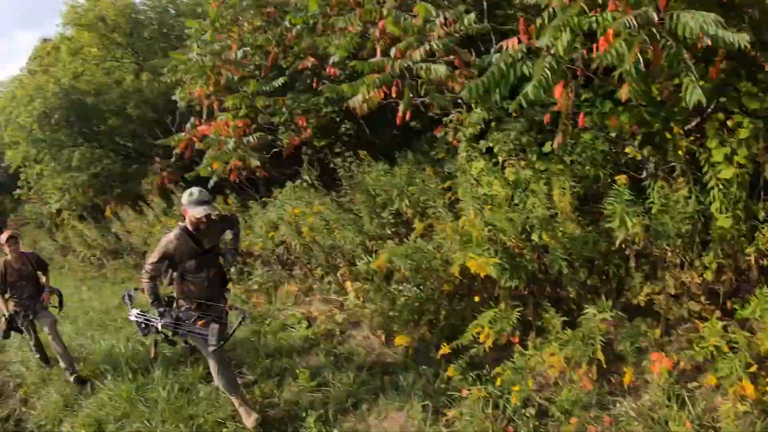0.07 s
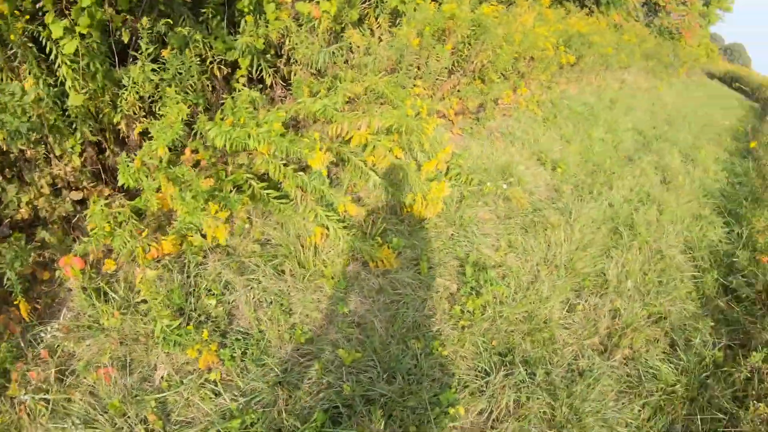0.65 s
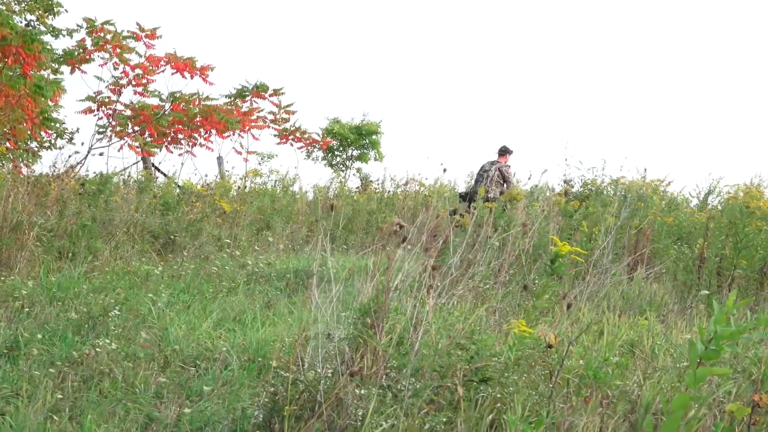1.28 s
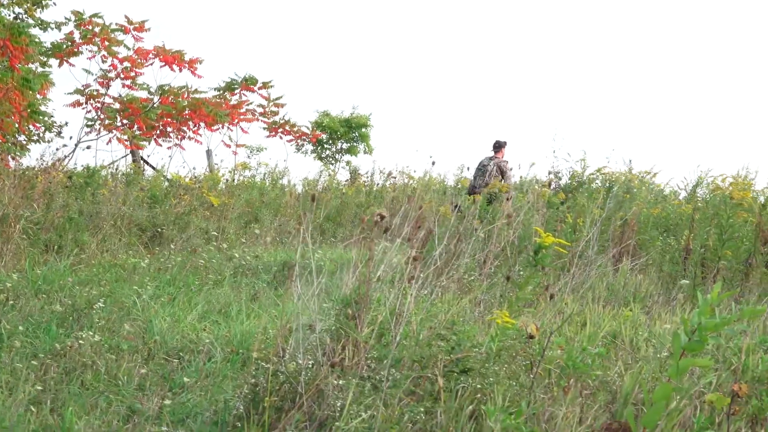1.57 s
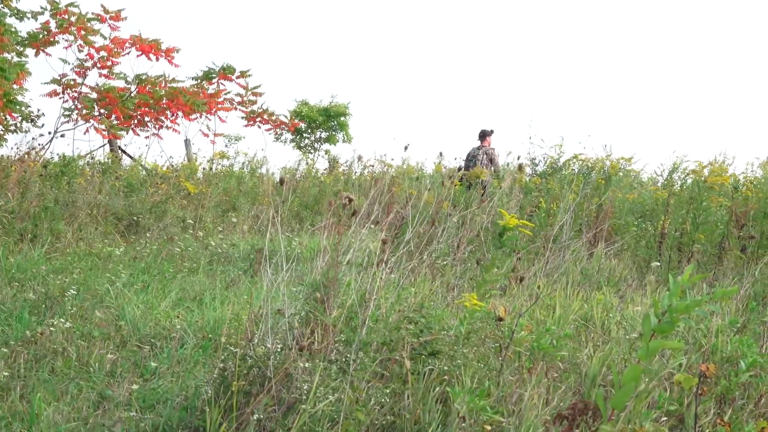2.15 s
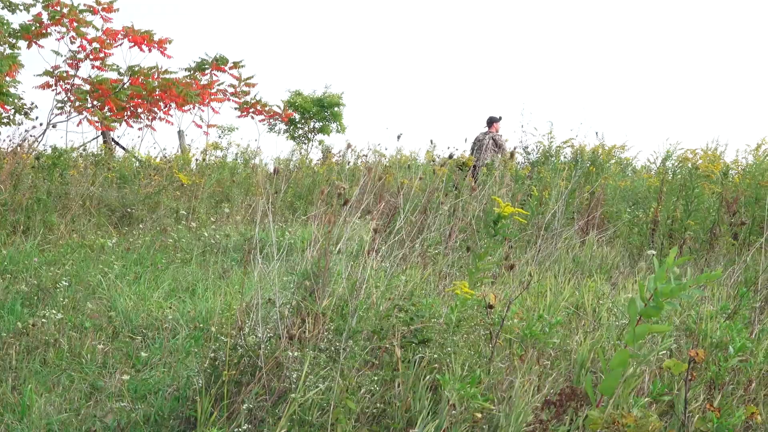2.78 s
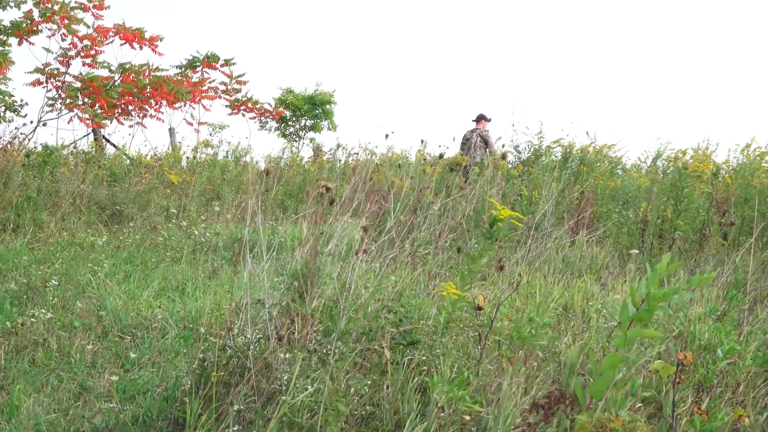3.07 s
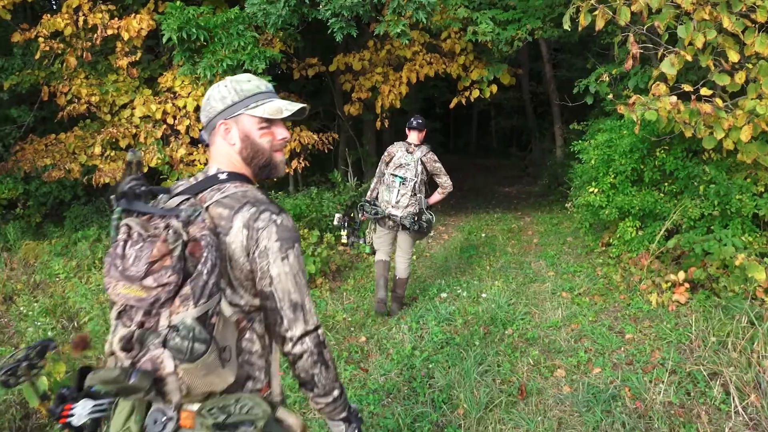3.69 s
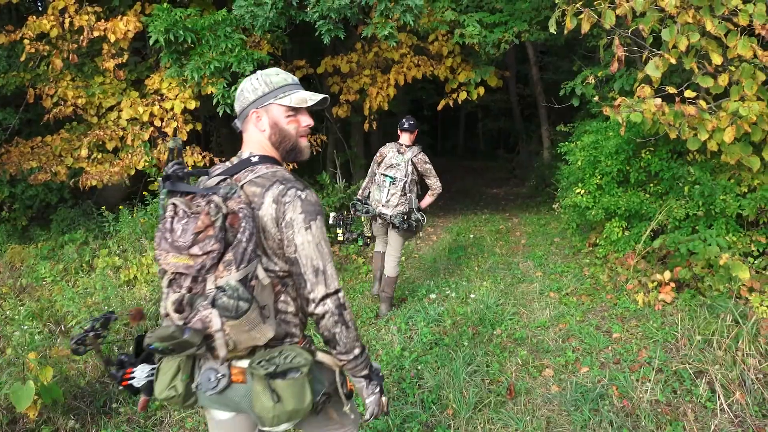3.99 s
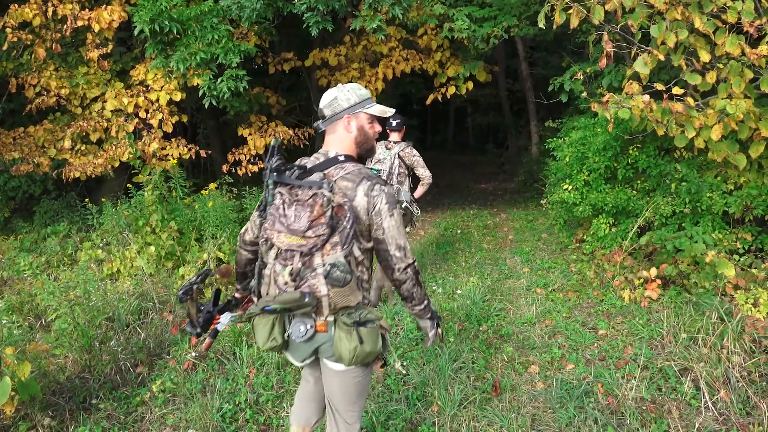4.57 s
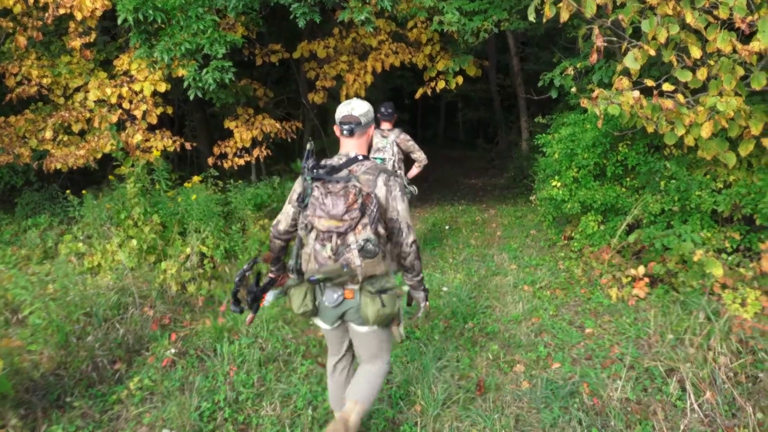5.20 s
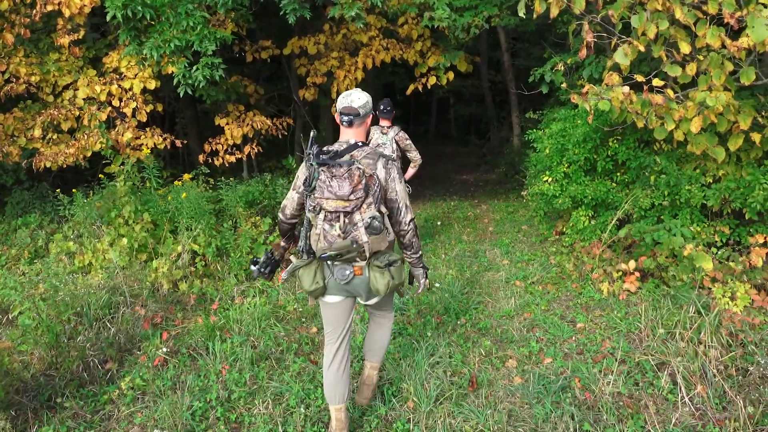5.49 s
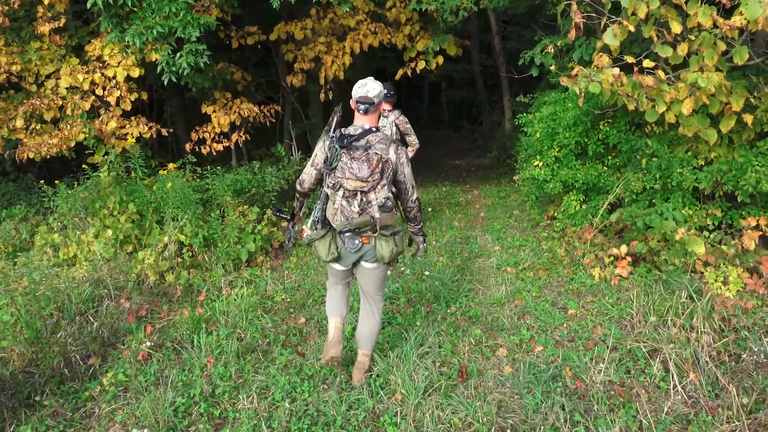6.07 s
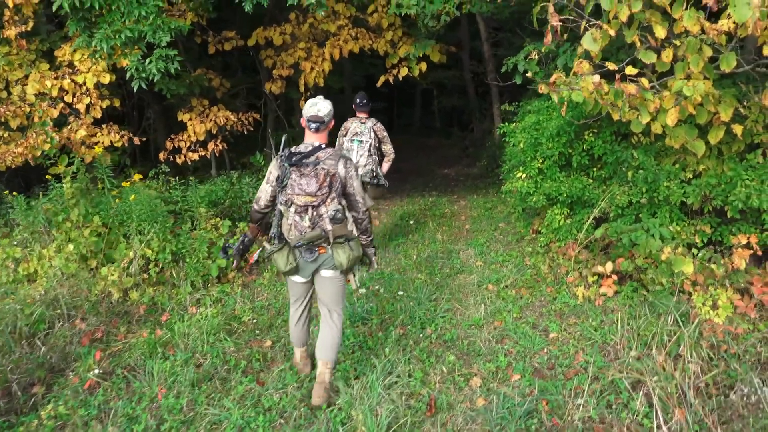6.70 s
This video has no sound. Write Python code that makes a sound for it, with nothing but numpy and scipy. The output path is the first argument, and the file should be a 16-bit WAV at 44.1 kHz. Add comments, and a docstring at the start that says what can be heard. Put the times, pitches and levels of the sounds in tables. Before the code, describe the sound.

Outdoors, a few steps brush through grass before an abrupt change to pulsing field crickets and a low, gusty rumble of wind on the microphone. About halfway through, the wind eases and walking resumes, with crackling blades, scuffing boots and many small stem snaps. One cricket trills quickly while another ticks irregularly, over a steady shimmer of far insects and soft air in the leaves.

```python
"""People walk through tall grass: legs swish through the blades, dry stems snap and boots scuff.
Crickets sing all round by drawing a scraper on one wing along a toothed file on the other.
We listen from a path, then suddenly from an open field, where their loud pulses fall in pitch,
then gradually from the edge of a wood, with a fast trill and a ticking cricket.
Behind them are far insects, air in the leaves and wind on the microphone, strongest in the field."""
import sys
import numpy as np
from scipy import signal
from scipy.fft import rfft, irfft, next_fast_len
from scipy.io import wavfile
from scipy.ndimage import uniform_filter1d, map_coordinates

SR = 44100
rng = np.random.default_rng(int(sys.argv[2]) if len(sys.argv) > 2 else 0)


def inscribe(sig):
    """Save sig as 16-bit PCM at rate SR to the path in sys.argv[1].

    A 1-D sig is mono; a 2-D sig holds one channel per row.
    Samples are clipped to [-1, 1] before scaling.
    """
    pcm = np.round(np.clip(np.atleast_2d(sig).T, -1, 1) * 32767)
    wavfile.write(sys.argv[1], SR, pcm.astype(np.int16))


N = 306390
T = np.arange(N) / SR

# Table levels are relative: the functions add their own gains.
# legs sweeping through grass: fastest moment t/s, fade time/s, swish level/dB, crackle level/dB
LEG_SWEEPS = [(.015, 0.11, -40.5, -45), (0.19, 0.016, -45, -42), (0.585, 0.072, -38.5, -58),
              (0.669, 0.06, -32.5, -38.5), (4.186, 0.03, -47, -44), (4.386, 0.086, -37, -37.5),
              (4.553, 0.05, -46, -42), (4.79, 0.046, -52, -43), (5.09, 0.047, -54, -43),
              (5.188, 0.085, -41, -44), (5.366, 0.12, -46.5, -66), (5.76, 0.08, -46, -38.5),
              (5.892, 0.048, -45.5, -44), (6.039, 0.064, -40, -40.5), (6.3, .12, -64, -51),
              (6.454, .06, -43.5, -52), (6.687, 0.034, -43.5, -42), (6.827, 0.095, -42.5, -43)]
# faint rustle between sweeps, a row each for path, field and wood: swish level/dB, crackle level/dB
RUSTLE = [(-50, -57), (-58, -71), (-54.5, -56.5)]
# tone of soft blades: f/Hz, level/dB
SWISH_TONE = [(150, 6), (400, -2), (700, -0.5), (1400, 1), (2800, 0), (5000, 0.5), (7500, -2),
              (10000, -9.5), (15500, -15)]
# tone of dry blades: f/Hz, level/dB
CRACKLE_TONE = [(1500, -5), (4000, -17), (6500, -4), (9000, 4), (10600, -9), (12600, 2), (15800, -9)]
# stems breaking: t/s, level/dB, extra level of the woody part/dB
STEM_SNAPS = [(0.0796, -18, -18), (3.941, -28, 3), (4.1671, -26, -8), (4.5359, -20, -19), (4.773, -24, -20),
              (4.859, -14.5, -27), (5.075, -26, -2), (5.235, -19.5, -5.5), (5.668, -20.5, -25),
              (5.7274, -21, -30), (5.8836, -26, -8), (5.914, -18.5, -6.5), (6.1118, -21, -6),
              (6.692, -21, -26.5), (6.7422, -20, -4), (6.798, -21, -18)]
# rubs and knocks: t/s, level/dB, f/Hz, band width/Hz, half length/s
BOOT_SCUFFS = [(.08, -22.5, 2040, 800, 0.0034), (.225, -29.5, 900, 350, .0072),
               (.603, -28.5, 920, 600, 0.014), (.68, -39, 650, 600, 0.048),
               (3.227, -41.5, 1000, 1200, 0.054), (4.323, -31, 2580, 1300, 0.025),
               (4.369, -29.5, 2920, 1500, .02), (4.685, -37.5, 1210, 1000, 0.017),
               (5.29, -31.5, 1380, 300, 0.0086), (5.505, -30.5, 760, 330, 0.041),
               (5.537, -33.5, 1300, 800, 0.05), (5.549, -25.5, 1210, 168, .02),
               (5.78, -33, 600, 700, 0.014), (5.9, -31, 880, 600, 0.026), (6.051, -29.5, 2820, 400, 0.0073),
               (6.047, -24, 8100, 700, 0.0064), (6.515, -30.5, 980, 1100, 0.0084)]
# chirps of near field crickets: first stroke t/s, last stroke t/s, level/dB, f/Hz
NEAR_CHIRPS = [(0.834, 1.108, -35, 4564), (1.308, 1.352, -37.5, 4590), (1.511, 1.597, -37, 4580),
               (1.663, 1.742, -36, 4695), (1.86, 1.954, -39.5, 4584), (2.165, 2.211, -36.5, 4560),
               (2.271, 2.361, -33.5, 4680), (2.47, 2.607, -39, 4550), (2.714, 2.811, -40, 4850),
               (2.915, 2.995, -37.5, 4470), (3.217, 3.304, -36.5, 4550), (3.468, 3.654, -35, 4673),
               (3.958, 4.015, -37, 4640), (4.15, 4.245, -42, 4570), (6.774, 6.819, -33, 5220)]
# how the ground cricket's trill grows: t/s, level/dB
TRILL_LEVELS = [(3.7, -62), (4.1, -48.5), (4.6, -44), (5.4, -45), (6.3, -41), (6.95, -40)]
# wing strokes of the ticking cricket: t/s, level/dB
TICK_STROKES = [(4.146, -39), (4.214, -37), (4.285, -40), (4.358, -41.5), (4.439, -33), (4.734, -24),
                (4.945, -28), (5.024, -39), (5.182, -28.5), (5.787, -34), (5.848, -34.5), (5.926, -34),
                (6.005, -36.5), (6.101, -32.5), (6.2, -35.5), (6.281, -38), (6.377, -31.5), (6.482, -29),
                (6.558, -37), (6.681, -28), (6.867, -29)]
# far insect choirs: f/Hz, band width/Hz, path level/dB, field level/dB, wood level/dB
INSECT_BANDS = [(3214, 230, -71, -49.5, -72), (3346, 290, -61, -65, -49.5), (4834, 450, -45.5, -47.5, -48),
                (5400, 440, -52, -54.5, -50), (7300, 860, -59, -57.5, -48), (7680, 1800, -47.5, -52, -50)]
# tone of air in far leaves: f/Hz, path level/dB, field level/dB, wood level/dB
AIR_TONES = [(102, -11, -5, -11), (290, -2.5, 1, 2.5), (513, 2, 0.5, -0.5), (810, -0.5, 0.5, 1.5),
             (1080, -2, -2.5, -2.5), (1470, -2, -3.5, -4), (2380, -9, -8, -8), (4050, -11, -8, -11.5),
             (6100, -14, -11, -19.5), (9150, -20, -18, -19), (11700, -16, -22, -25),
             (15800, -21, -20, -18.5)]
# steady wind on the microphone: path level/dB, field level/dB, wood level/dB
BREEZE_LEVELS = [-47.5, -34, -45.5]
# gusts of wind: t/s, rise and fall time/s, level/dB
WIND_GUSTS = [(0.217, .05, -37), (1.652, 0.096, -25.5), (2.056, 0.42, -32), (2.503, .12, -31),
              (3.023, .1, -30), (3.73, 0.091, -38), (3.953, 0.055, -33), (5.522, 0.064, -35),
              (6.95, 0.24, -41)]
# tone of the wind's rumble: f/Hz, level/dB
RUMBLE_TONE = [(12, -40), (28, 11), (52, 0.5), (75, -1.5), (130, -4), (155, -13), (210, -18.5),
               (400, -30.5), (1200, -65)]
# tone of the air's slow sway, mostly too low to hear: f/Hz, level/dB
SWAY_TONE = [(2, -10.5), (6, -8), (9, -5), (14, -4), (19, -6), (26, -30), (38, -34), (60, -78), (120, -62)]
# strength of that sway: t/s, level/dB
SWAY_LEVELS = [(0.0, -20.5), (0.25, -11), (0.58, -21.5), (0.64, -16), (0.83, -26), (0.97, -20.5),
               (1.76, -21.5), (1.84, -16), (2.15, -21), (3.81, -18), (4.1, -30), (4.51, -17.5), (5.13, -37),
               (5.26, -22), (6.21, -18.5), (6.41, -28.5), (6.89, -15), (6.95, -29)]


def legs_in_grass(gain_db=-2):
    """Each leg drags through tufts: soft blades swish and dry ones crackle, both in clumps."""
    power = amp(RUSTLE).T ** 2 @ places() ** 2
    for at, fade, *levels in LEG_SWEEPS:
        power += np.outer(amp(levels), swell(at, rise=1.05 * fade, fall=fade, shape=1.1)) ** 2
    swish, crackle = np.sqrt(power)
    tufts = unit(amp(wander(130)))
    soft = colour(tufts * blade_clicks(per_s=12000, spread_db=2.5), SWISH_TONE, band=(1700, 2900))
    dry = colour(tufts * blade_clicks(per_s=5500, spread_db=3), CRACKLE_TONE, band=(10500, 15500))
    return amp(gain_db) * (swish * soft + crackle * dry)


def blade_clicks(per_s, spread_db):
    """Blade taps against blade in tiny clicks: many faint, a few strong."""
    size = amp(spread_db * np.minimum(rng.exponential(1, N), 4))
    return unit(size * rng.standard_normal(N) * (rng.random(N) < per_s / SR))


def snapping_stems(crack_s=.00058, splinter_s=.0022, splinter_db=-19):
    """A stem breaks with one sharp crack and a short splintering."""
    out, t = np.zeros(N), np.arange(2048) / SR
    fade = np.exp(-t / crack_s) + amp(splinter_db) * np.exp(-t / splinter_s)
    woody_tone = [(300, -9), (1900, 7), (4500, 8), (8000, -16), (15000, -50)]
    crisp_tone = [(1000, -3), (5000, 1), (9000, .5), (13500, -3), (16000, .5)]
    for at, db, woody_db in STEM_SNAPS:
        woody = amp(woody_db + .5) * colour(rng.standard_normal(len(t)), woody_tone)
        crisp = amp(1) * colour(rng.standard_normal(len(t)), crisp_tone)
        add(out, at, amp(db) * (woody + crisp) * fade)
    return out


def scuffing_boots():
    """Boots, stalks and gear rub and knock, each ringing briefly around one pitch."""
    out = np.zeros(N)
    for at, db, hz, width, half_length in BOOT_SCUFFS:
        bell = np.exp(-np.linspace(-2, 2, int(2 * half_length * SR)) ** 2)
        rub = band_noise(hz, width, size=16384)[:len(bell)] * bell
        add(out, at - half_length, .5 * amp(db) * unit(rub))
    return out


def field_crickets(bout_at_s=.745, bout_every_s=.413, swing_db=4):
    """Near crickets chirp over farther ones that swell together in bouts; wings add weak overtones."""
    strokes = [row for one in NEAR_CHIRPS for row in chirp(*one)]
    near = amp(2.5) * song(strokes, length=.03, fall=.0826, rasp=.0087)
    bouts = crowd(count=220, hz=4918, spread=.025, db=-38)
    bouts[:, 1] += swing_db * np.cos(2 * np.pi * (bouts[:, 0] - bout_at_s) / bout_every_s)
    far = song(bouts, length=.023, fall=.036, rasp=.014)
    far += song(crowd(count=150, hz=4700, spread=.04, db=-37.5), length=.022, fall=.055, rasp=.0025)
    overtones = song(crowd(count=150, hz=9400, spread=.05, db=-53.5), length=.019, fall=.05, rasp=.007)
    overtones += song(crowd(count=170, hz=14750, spread=.035, db=-57), length=.014, fall=.025, rasp=.006)
    small = song(crowd(count=36, hz=7880, spread=.018, db=-40), length=.026, fall=.054, rasp=.014)
    small += song(crowd(count=190, hz=8160, spread=.04, db=-47.5), length=.028, fall=.034, rasp=.0067)
    small += song(crowd(count=130, hz=7110, spread=.0175, db=-48.5), length=.018, fall=.028, rasp=.011)
    in_field = places()[1]
    return near + in_field * (far + overtones + small)


def trilling_cricket(start_s=3.6975, strokes_per_s=40.85, hz=7730, gain_db=5):
    """A ground cricket's quick, even wing strokes run together into a trill."""
    times = np.arange(start_s, T[-1], 1 / strokes_per_s)
    levels = np.interp(times, *np.transpose(TRILL_LEVELS)) + rng.normal(0, 1, len(times))
    strokes = [(at, db, hz) for at, db in zip(times, levels)]
    return amp(gain_db) * song(strokes, length=.013, fall=.023, rasp=.0064)


def ticking_cricket(hz=8420, usual_db=-31, drop_hz_per_db=15):
    """Uneven ticks: a harder stroke runs farther down the file and sounds lower."""
    strokes = [(at, db, hz - drop_hz_per_db * (db - usual_db)) for at, db in TICK_STROKES]
    ticks = song(strokes, length=.019, fall=.031, rasp=.023)
    skids = np.zeros(N)  # the scraper also skids and buzzes, which stands out in light strokes
    for at, db in TICK_STROKES:
        add(skids, at - .016, amp(-26.5 + .25 * db) * np.hanning(1200))
    return ticks + skids * band_noise(hz=8360, width=800)


def chirp(first, last, db, hz, gap_s=.046, spread_db=1.6, spread_hz=51):
    """Evenly spaced wing strokes, each a little different: rows of t/s, level/dB, f/Hz."""
    times = np.linspace(first, last, round((last - first) / gap_s) + 1)
    return [(at, db + spread_db * rng.normal(), hz + spread_hz * rng.normal()) for at in times]


def crowd(count, hz, spread, db):
    """Scattered strokes of many farther crickets: rows of t/s, level/dB, f/Hz."""
    late, loud, sharp = rng.uniform(-.84, 1, (count, 3)).T
    times = (np.arange(count) + .7 * late) * T[-1] / count
    return np.transpose([times, db + 2.2 * loud, hz * (1 + spread * sharp)])


def song(strokes, length, fall, rasp):
    """Plays wing strokes, each centred on its time; strokes that stop early stay high."""
    out, usual_hz = np.zeros(N), np.median(np.array(strokes)[:, 2])
    for at, db, hz in strokes:
        reach = np.clip(usual_hz / hz, .85, 1.05) ** 3 * rng.uniform(.88, 1.08)
        pulse = wing_stroke(hz, reach * length, reach * fall * rng.uniform(.89, 1.16), rasp)
        add(out, at - reach * length / 2, amp(db) * pulse)
    return out


def wing_stroke(hz, length, fall, rasp):
    """The scraper slows along the file, so the pitch falls; uneven teeth make it rasp."""
    along = np.linspace(-1, 1, int(length * SR))
    uneven = unit(uniform_filter1d(rng.standard_normal(4096), 30))[:len(along)]
    pitch = hz * (1 - fall * (along + .2 * along ** 2) + rasp * uneven)
    fade = (1 - along ** 2) ** .9
    return np.sqrt(2) * np.sin(2 * np.pi * np.cumsum(pitch) / SR) * fade


def scatter(sound, echo_db, decay_s=.014):
    """Stems and ground bounce the song around into a short haze of echoes."""
    t = np.arange(4096) / SR
    tail = rng.standard_normal(len(t)) * np.exp(-t / decay_s)
    return sound + amp(echo_db) * signal.oaconvolve(sound, tail / np.linalg.norm(tail))[:N]


def wind():
    """Air swirls at the microphone: a very slow sway, and a lumpy rumble that grows in gusts."""
    sway = colour(rng.standard_normal(N), SWAY_TONE + [(600, -120)])
    sway = unit(sway / (abs(signal.hilbert(sway)) + 2))  # evens out the size of the swings
    sway *= amp(np.interp(T, *np.transpose(SWAY_LEVELS)))
    lumps = rng.standard_normal(N) * amp(wander(14))
    rumble = colour(lumps, RUMBLE_TONE + [(5000, -100)], band=(45, 180))
    breeze_power = amp(BREEZE_LEVELS) ** 2 @ places() ** 2
    gust_power = sum((amp(db) * swell(at, fade, fade)) ** 2 for at, fade, db in WIND_GUSTS)
    return sway + amp(-.5) * np.sqrt(breeze_power + gust_power) * rumble


def far_insects(shimmer_db=1.5):
    """Many far insects blend into shimmering bands of hiss."""
    shares = places()
    return sum(amp(levels) @ shares * band_noise(hz, width) * amp(shimmer_db * wander(70))
               for hz, width, *levels in INSECT_BANDS)


def air_in_leaves(place_db=(-42.5, -41.5, -41)):
    """Air moving through far leaves makes a gently wavering hush, with its own tone in each place."""
    hush, tones = np.zeros(N), np.array(AIR_TONES)
    for k, share in enumerate(places()):
        hush += amp(place_db[k]) * share * colour(rng.standard_normal(N), tones[:, [0, k + 1]])
    return hush * amp(.5 * wander(6))


def path_hum():
    """A faint, low hum hangs by the path."""
    return amp(-50) * band_noise(hz=125.2, width=3.2) * places()[0]


def places(field_at_s=.772, field_fade_s=.004, wood_at_s=4.15, wood_fade_s=.72):
    """How much we hear of the path, the field and the wood's edge; the squares add up to 1."""
    field = np.clip((T - field_at_s) / field_fade_s, 0, 1)
    wood = np.clip((T - wood_at_s) / wood_fade_s + .5, 0, 1)
    return np.sqrt([1 - field, field * (1 - wood), wood])


def amp(db):
    """Turns decibels into a number to multiply by."""
    return 10 ** (np.asarray(db) / 20)


def unit(x):
    """Scales a sound to an average power of 1."""
    return x / np.sqrt(np.mean(x ** 2) + 1e-20)


def add(mix, start_s, sound):
    """Mixes a sound in at the given time."""
    part = mix[max(round(start_s * SR), 0):][:len(sound)]
    part += sound[:len(part)]


def colour(x, tone, band=None):
    """Shapes x by rows of f/Hz, level/dB; its power is 1 overall, or inside the band if given."""
    hz = np.fft.rfftfreq(len(x), 1 / SR)
    tone_hz, tone_db = np.transpose(tone)
    gain = amp(np.interp(np.log(hz + 1), np.log(tone_hz + 1), tone_db))
    spectrum = rfft(x) * gain * (hz > 0)
    inside = 1 if band is None else (hz > band[0]) & (hz < band[1])
    return irfft(spectrum, len(x)) / np.std(irfft(spectrum * inside, len(x)))


def band_noise(hz, width, size=N):
    """Noise gathered around one pitch."""
    length = next_fast_len(size)
    bell = np.exp(-((np.fft.rfftfreq(length, 1 / SR) - hz) / width) ** 2)
    return unit(irfft(rfft(rng.standard_normal(length)) * bell, length)[:size])


def wander(per_s):
    """A smooth random curve that changes about per_s times a second."""
    return unit(map_coordinates(rng.standard_normal(4096), [T * per_s], order=2, mode="wrap"))


def swell(at, rise, fall, shape=2):
    """A curve that rises to 1 and falls away; shape 1 is pointed, 2 is a bell."""
    distance = abs(T - at) / np.where(T < at, rise, fall)
    return np.exp(-np.minimum(distance, 20) ** shape)


def scene():
    """Walkers, crickets and wind over a soft background that dips briefly near the start."""
    by_wood = scatter(trilling_cricket() + ticking_cricket(), echo_db=-18)
    dip = amp(np.interp(T, [.19, .21, .255, .29], [1, -11, -4, .5]))
    background = dip * (far_insects() + air_in_leaves() + path_hum())
    walkers = legs_in_grass() + snapping_stems() + scuffing_boots()
    in_field = scatter(field_crickets(), echo_db=-9)
    return (walkers + in_field + by_wood + wind() + background)[None]


def record(dry):
    """Cuts away the very highest treble."""
    low_pass = signal.firwin(1023, cutoff=15760, window=("kaiser", 9), fs=SR)
    return signal.oaconvolve(dry, low_pass[None], "same")


dry = scene()
out = record(dry)
inscribe(out)
```